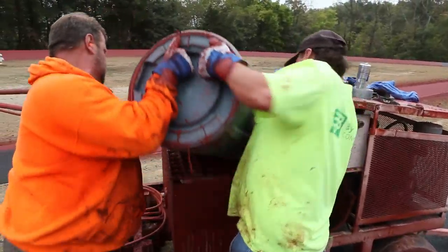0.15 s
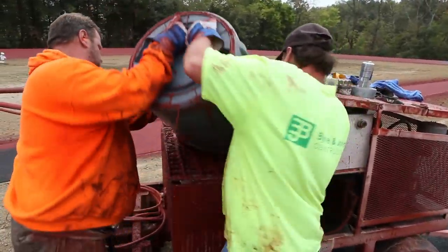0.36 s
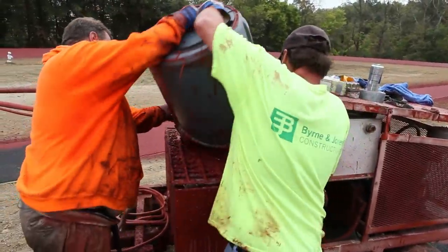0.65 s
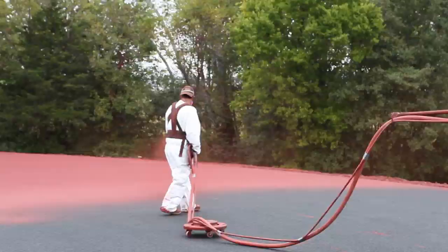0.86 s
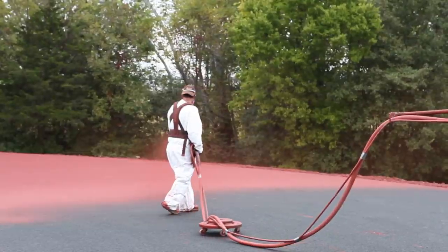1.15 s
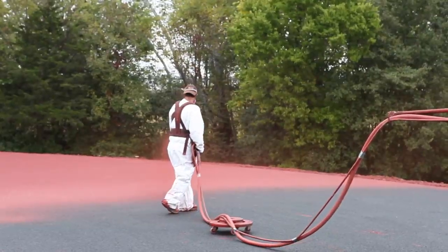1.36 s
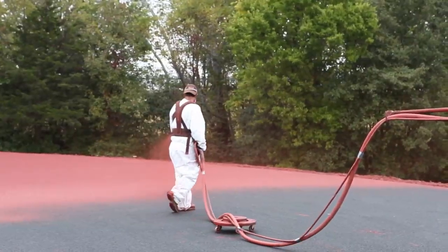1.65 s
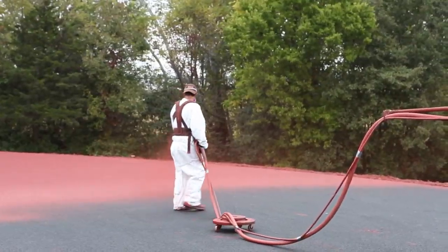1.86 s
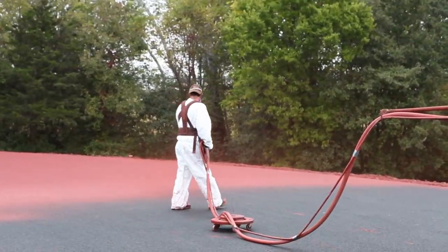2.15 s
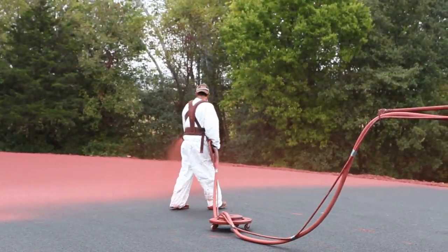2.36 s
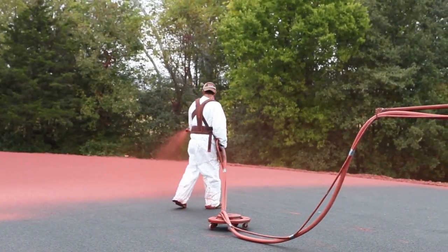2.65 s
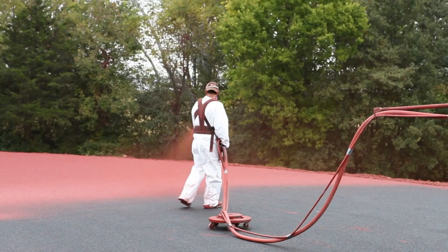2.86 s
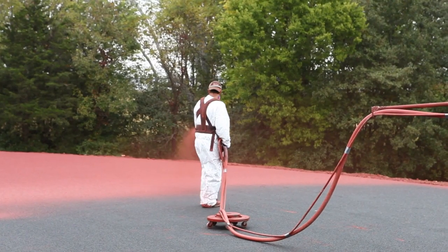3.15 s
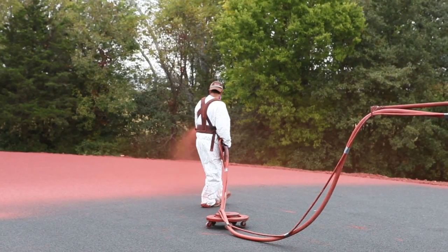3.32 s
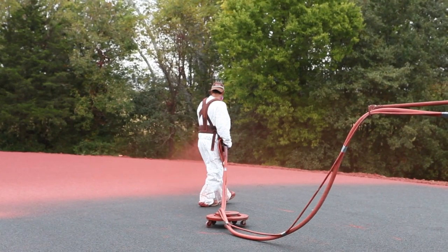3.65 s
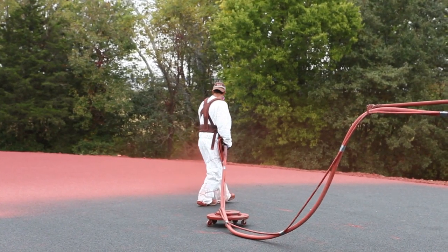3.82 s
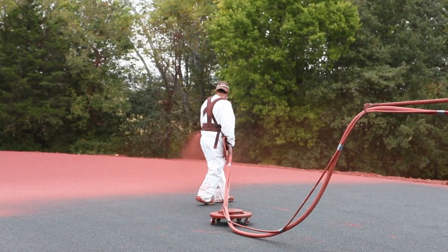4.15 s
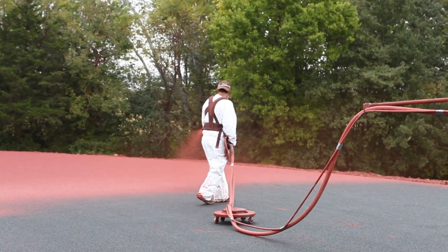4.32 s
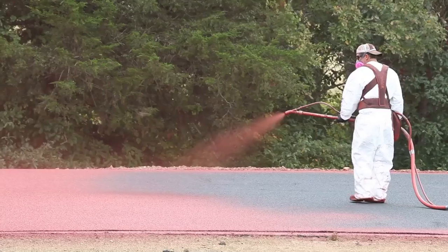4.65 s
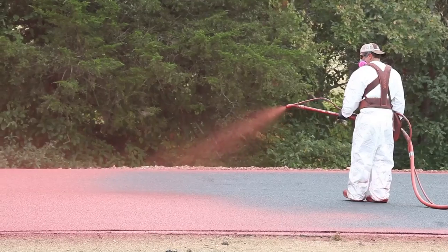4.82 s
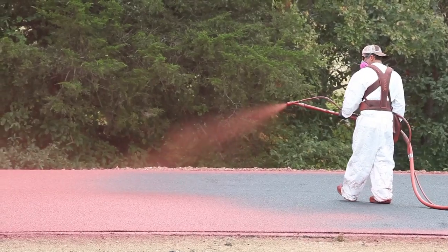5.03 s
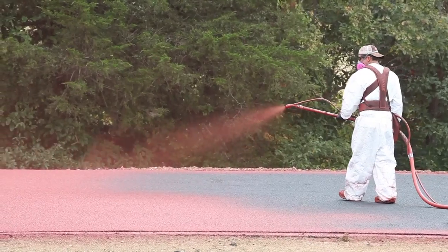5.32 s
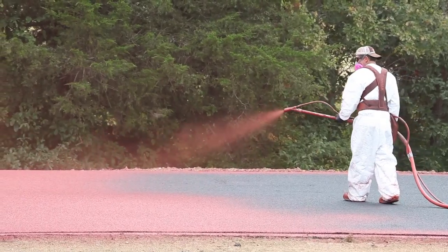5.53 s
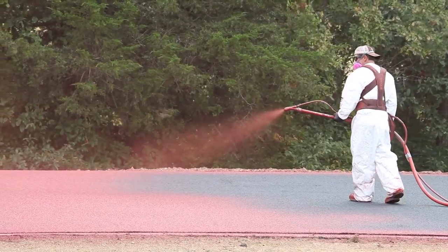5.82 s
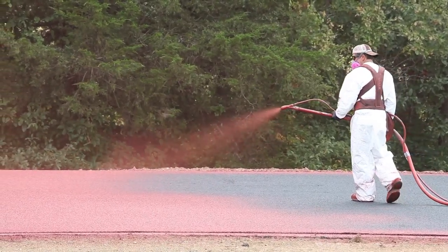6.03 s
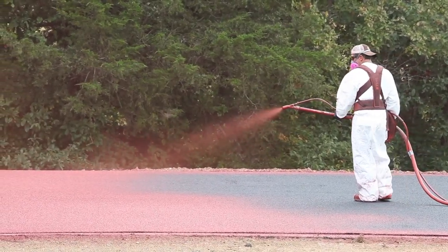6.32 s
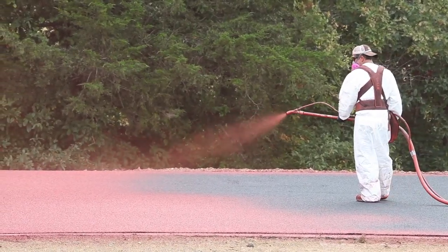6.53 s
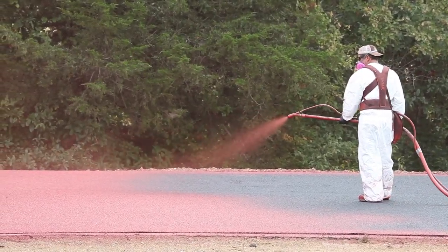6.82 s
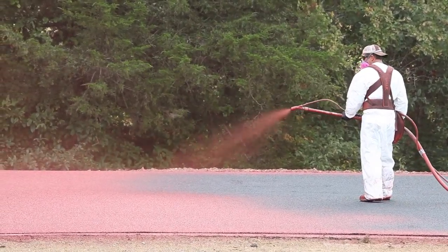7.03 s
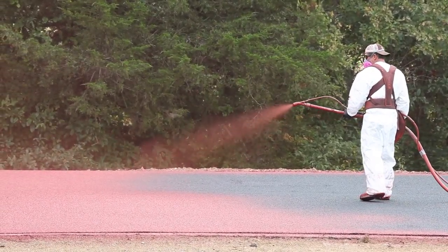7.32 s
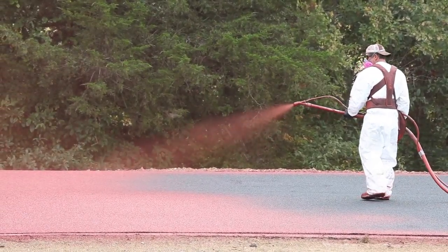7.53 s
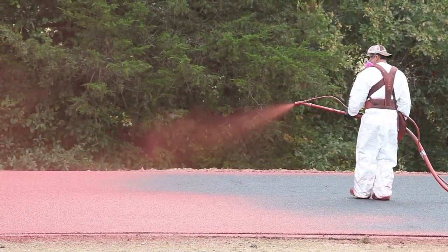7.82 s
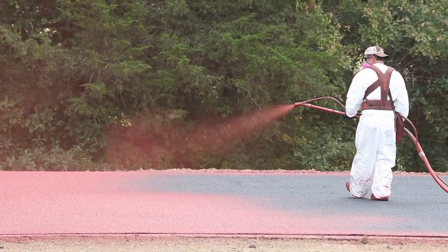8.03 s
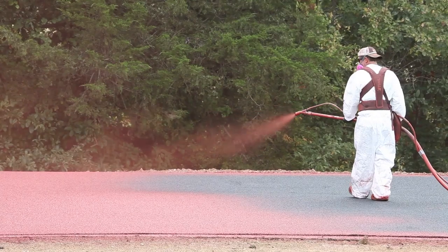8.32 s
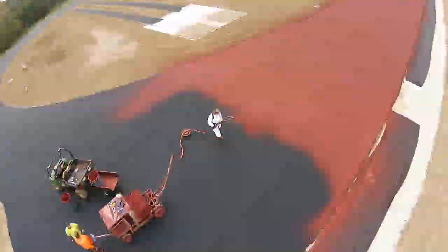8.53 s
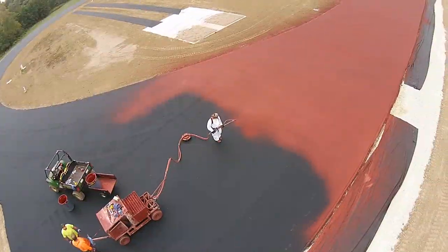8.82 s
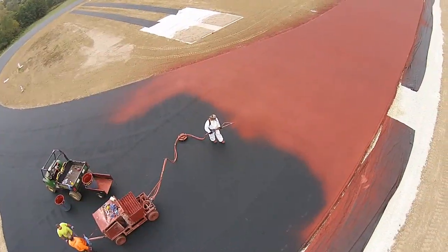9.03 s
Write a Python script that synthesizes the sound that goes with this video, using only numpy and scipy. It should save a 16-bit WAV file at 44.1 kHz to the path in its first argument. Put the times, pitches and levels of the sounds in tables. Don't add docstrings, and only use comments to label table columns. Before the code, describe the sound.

Three adjoining views of a paint spraying rig, all mono and outdoors. First, close separate engine chuffs with a soft fan rush; then a faster, steady motor rattle mixed with hiss that rises and falls five times as the jet swings past. Last and loudest, a close spray of wet granules, surging irregularly with fine ticks, its tone sweeping and nearly masking the distant engine. Sudden silence ends it.

```python
import sys
import numpy as np
from scipy import signal
from scipy.fft import rfft, irfft, next_fast_len
from scipy.io import wavfile
from scipy.ndimage import uniform_filter1d, map_coordinates

SR = 44100
rng = np.random.default_rng(int(sys.argv[2]) if len(sys.argv) > 2 else 0)


def decibels_to_gain(level_db):
    exponent = np.asarray(level_db, float) / 20
    return 10 ** exponent


def master_out(mix):
    frames = np.transpose(np.atleast_2d(mix))
    ceiling = np.clip(frames, -1, 1)
    pcm = np.round(ceiling * 32767).astype(np.int16)
    wavfile.write(sys.argv[1], SR, pcm)


N = 404397

FRAME = 512
LEAD = 4096
# f/Hz, level per Hz/dB
JET_COLOUR = [(30, -48.5), (140, -14), (320, -20), (430, -26), (900, -17), (1500, -8), (2900, -8),
              (4100, -4), (7200, -2), (9200, -12.5), (10300, -23), (12200, -22), (14000, -32.5),
              (15800, -39.5)]


def unit(x):
    return x / np.sqrt(np.mean(x ** 2) + 1e-20)


def along(points, hz):
    f, v = np.transpose(points)
    return np.interp(np.log(hz + 1), np.log(f + 1), v)


def curves(rows, t):
    s, *columns = np.transpose(rows)
    return [np.interp(t, s, column) for column in columns]


def bumps(s, at, half_s):
    at = np.reshape(at, (-1, 1))
    half_s = np.reshape(half_s, (-1, 1))
    return np.exp(-((s - at) / half_s) ** 2)


def filtered(x, response):
    m = next_fast_len(len(x) + SR // 2)
    hz = np.fft.rfftfreq(m, 1 / SR)
    return irfft(rfft(x, m) * response(hz), m)[:len(x)]


def wobble(n, rate):
    knots = rng.standard_normal(int(n * rate / SR) + 4)
    return map_coordinates(knots, [np.arange(n) * rate / SR])


def rush(t, rows, spectrum, width_hz, grit_db, patchy_db, flutter_db, bright, ground=[(0, 1, 0)]):
    grit = decibels_to_gain(grit_db * wobble(len(t), 1400) + flutter_db * wobble(len(t), 60))
    hz, s, z = signal.stft(grit * rng.standard_normal(len(t)), SR, nperseg=FRAME)
    hz = hz[:, None]
    level_db, peak_hz, peak_db = curves(rows, t[0] + s)
    notch_hz, echo = curves(ground, t[0] + s)

    patches = uniform_filter1d(rng.standard_normal(z.shape), size=8, axis=0)
    patches = uniform_filter1d(patches, size=14, axis=1)
    colour_db = along(spectrum, hz) + patchy_db * unit(patches)
    colour_db += peak_db * np.exp(-((hz - peak_hz) / width_hz) ** 2)
    colour_db += bright * (level_db - level_db.mean()) * np.log2(np.maximum(hz, 700) / 6000)
    colour_db -= 7 * echo * np.exp(-((hz - notch_hz) / 330) ** 2)

    echo = echo * np.clip(hz / 3000, 0, 1)
    turns = (hz / notch_hz) ** .93
    gain = decibels_to_gain(colour_db) * (1 - np.clip(echo, 0, .9) * np.exp(-2j * np.pi * turns))
    gain /= np.sqrt(np.mean(abs(gain) ** 2, axis=0))
    hiss = signal.istft(z * gain, SR, nperseg=FRAME)[1][:len(t)]
    return decibels_to_gain(curves(rows, t)[0]) * unit(hiss)


def granules(t):
    per_s, level_db, spread_db = 110, -37, 12
    hits = rng.random((2, len(t)))
    size_db = spread_db * rng.random(len(t)) ** 2
    ticks = (hits[0] < per_s / SR) * np.sign(hits[1] - .5) * decibels_to_gain(size_db)
    return decibels_to_gain(level_db) * unit(filtered(ticks, lambda f: decibels_to_gain(along(JET_COLOUR, f))))


def engine(t, speed, order, levels, pipe, shake, blast, blow_s, scatter_db, second_db, wall):
    first, lag_second = order
    cycle = np.cumsum(curves(speed, t)[0]) / SR
    cycle = cycle - cycle[LEAD] - first
    pulses = np.zeros(len(t))
    for lag, db in [(0, 0), (lag_second, second_db)]:
        fired = np.flatnonzero(np.diff(np.floor(cycle - lag)))
        pulses[fired] = decibels_to_gain(db + scatter_db * rng.standard_normal(len(fired)))

    def chamber(f, c, w):
        return 1.5j * f * w / (c * c - f * f + 1.5j * f * w)

    def modes(f):
        return sum((-1) ** k * decibels_to_gain(db) * chamber(f, c, w) ** 2 for k, (c, w, db) in enumerate(pipe))

    def puff(f):
        return np.exp(-2j * np.pi * f * 0.00058) / (1 + 2j * np.pi * f * blow_s) ** 4

    def bounce(f):
        delay_s, share = wall
        return (1 + share * np.exp(-2j * np.pi * f * delay_s)) / np.hypot(1, share)

    beat = -unit(filtered(pulses, modes))
    for k, db in shake:
        beat += decibels_to_gain(db + 3) * np.sin(2 * np.pi * (round(k) * cycle + rng.random()))
    opening = filtered(pulses, puff)
    gas = filtered(rng.standard_normal(len(t)), lambda f: decibels_to_gain(along(blast, f)))
    beat_db, blast_db = curves(levels, t)
    direct = decibels_to_gain(beat_db) * beat + decibels_to_gain(blast_db) * unit(opening * gas)
    return filtered(direct, bounce)


def idling(t):
    # t/s, rate/Hz
    idle_speed = [(0.0, 16.87), (0.313, 16.93), (0.627, 16.69), (0.94, 17.14)]
    # t/s, beat/dB, gas blast/dB
    idle_levels = [(0, -22, -28), (0.94, -23, -26)]
    # f/Hz, width/Hz, level/dB
    idle_pipe = [(97.8, 27.3, 3.5), (146, 19, -11.5), (171.5, 35, -14), (275, 160, -15.5), (342, 22, 2),
                 (425.5, 19, -6), (490, 28.5, -2.5), (548, 39, -11.5), (693, 83, -12.5), (895, 15, -12),
                 (991, 29, -6), (1202, 40, -8.5), (1310, 33, -5.5), (1456, 54, -11.5), (1728, 74, -17.5),
                 (2374, 58, -10)]
    # multiple of the cycle, level against the beat/dB
    idle_shake = [(4, -27.5), (9, -13.5), (11, -10.5), (15, -16), (17, -17)]
    # f/Hz, level per Hz/dB
    idle_blast = [(60, -37), (150, -19), (500, -7.5), (800, -10), (1300, -6), (1880, -7.5), (2410, -8),
                  (2800, -11), (3300, -11.5), (5900, -10.5), (6700, -3.5), (7800, -12), (9000, -22),
                  (15800, -48)]
    # t/s, level/dB, hiss peak f/Hz, hiss peak/dB
    idle_air = [(0, -27.5, 6630, 3), (0.941, -27, 6610, 0.5)]
    # f/Hz, level per Hz/dB
    idle_rush = [(30, -42), (100, -4.5), (500, -11), (1200, -14), (3000, -22), (6600, -15.5), (8600, -29.5),
                 (11500, -27.5), (15800, -34)]
    chuffs = engine(t, idle_speed, (.095, .378), idle_levels, idle_pipe, idle_shake, idle_blast,
                    blow_s=0.002, scatter_db=0.7, second_db=2.0, wall=(.0074, .3))
    fan = rush(t, idle_air, idle_rush, width_hz=790, grit_db=0.5, patchy_db=1.5, flutter_db=0.5, bright=0)
    return chuffs + fan


def working(t):
    # t/s, rate/Hz
    work_speed = [(0.95, 27.215), (2.632, 27.25), (3.305, 27.42), (3.641, 27.27), (4.65, 27.0)]
    # t/s, beat/dB, gas blast/dB
    work_levels = [(0.95, -23, -24.5), (2.79, -25, -26), (4.64, -23.5, -26.5)]
    # f/Hz, width/Hz, level/dB
    work_pipe = [(81, 43, -4), (166.9, 22.3, 3.5), (433.7, 18, -13.5), (485.7, 17, -12.5), (712, 98, -4.5),
                 (761, 150, -13.5), (1008, 34, -10), (1075, 52, -14.5), (1536, 51, -10), (1823, 37.4, -1.5),
                 (2223, 60, -16.5), (2340, 45, -30), (2781, 70, -12.5), (3764, 92, -21), (4476, 100, -16)]
    # multiple of the cycle, level against the beat/dB
    work_shake = [(1, -24), (7, -14), (9, -30), (10, -36.5), (12, -22), (14, -27), (25, -34.5), (28, -21),
                  (42, -21)]
    # f/Hz, level per Hz/dB
    work_blast = [(150, -13.5), (450, -29), (720, -12), (900, -16.5), (1050, -3.5), (1400, -5), (1830, 1.5),
                  (2050, -4), (2750, -2), (4430, -3.5), (5450, -4.5), (6480, 2.5), (9650, -12.5),
                  (15800, -35)]
    # f/Hz, level per Hz/dB
    work_rush = [(30, -40), (150, -3), (300, -12), (700, -4.5), (2000, -8.5), (4000, -6.5), (6400, -3.5),
                 (8400, -8.5), (9700, -21), (12000, -25.5), (15800, -42.5)]
    # t/s, gain/dB
    passes = [
        (0.93, 3.5),
        (1.6, 4),
        (2.62, 6.5),
        (3.33, 4.5),
        (4.3, 5),
    ]
    rattle = engine(t, work_speed, (.435, .381), work_levels, work_pipe, work_shake, work_blast,
                    blow_s=0.0016, scatter_db=0.0, second_db=-0.3, wall=(.0074, .35))
    s = t[::FRAME]
    at, gain_db = np.transpose(passes)
    swell_db = gain_db @ bumps(s, at, .25)
    jet = np.c_[s, -30 + swell_db, 6300 + 39 * swell_db, 1.8 + .3 * swell_db]
    return rattle + rush(t, jet, work_rush, width_hz=1100, grit_db=1.0, patchy_db=1.45,
                         flutter_db=0.5, bright=0.53)


def spraying(t):
    # t/s, rate/Hz
    far_speed = [(4.655, 26.8), (5.523, 26.99), (5.957, 26.86), (6.391, 26.98), (7.9, 27.0), (8.56, 27.13)]
    # f/Hz, width/Hz, level/dB
    far_pipe = [(54, 27, -1), (77, 42, 3), (159.5, 59, 4), (230, 69, -3.5), (345, 22, -11.5),
                (627, 89, -10.5), (830, 98, -6), (1114, 180, -14), (1720, 1140, -8), (3500, 900, -39)]
    # multiple of the cycle, level against the beat/dB
    far_shake = [(4, -20.5), (9, -15.5), (11, -18.5), (12, -15.5), (14, -21.5), (20, -25), (23, -18.5),
                 (27, -20), (28, -24)]
    # f/Hz, level per Hz/dB
    far_blast = [(300, -32), (800, -11), (1800, -5.5), (3500, -6.5), (6500, -7.5), (9000, -25),
                 (15800, -66)]
    # t/s, loss/dB, half length/s
    lulls = [
        (4.68, 5, 0.13),
        (5.67, 4, 0.12),
        (6.45, 2, 0.2),
        (7.1, 5.3, 0.31),
        (7.92, 2.9, 0.45),
    ]
    # t/s, gain/dB, half length/s, hiss peak gain/dB
    surges = [(4.72, 4.5, .11, 7), (5.23, 5.5, .22, -1.5), (5.616, 4, 0.15, 2.5), (6.037, 4, 0.19, -0.5),
              (6.347, 5.5, 0.19, 2), (6.724, 3.5, 0.17, 1.5), (6.97, 4, 0.12, 3.5), (7.42, 2, 0.2, 2.5),
              (7.8, 3.5, 0.18, 0.5), (8.241, 2, 0.17, 0.9), (8.57, 5, 0.13, 5)]
    # t/s, drop/Hz, half length/s
    dips = [
        (5.27, 600, 0.25),
        (5.95, 447, 0.36),
        (6.44, 870, 0.31),
        (8.143, 582, 0.38),
    ]
    s = t[::FRAME]
    at, loss_db, half_s = np.transpose(lulls)
    shade_db = loss_db @ bumps(s, at, half_s)
    far = np.c_[s, -37 - shade_db, -42.5 - 1.48 * shade_db]
    drone = engine(t, far_speed, (.195, .38), far, far_pipe, far_shake, far_blast,
                   blow_s=0.00041, scatter_db=0.2, second_db=-3.2, wall=(.0074, .15))

    at, gain_db, half_s, aim_db = np.transpose(surges)
    surge = bumps(s, at, half_s)
    jet = np.c_[s, -24 + gain_db @ surge, 6870 + 0 * s, 1.5 + aim_db @ surge]

    at, drop_hz, half_s = np.transpose(dips)
    dip_hz = drop_hz @ bumps(s, at, half_s)
    sweep = np.c_[s, 3800 - dip_hz, .27 + .26 * dip_hz / 1000]
    spray = rush(t, jet, JET_COLOUR, width_hz=2000, grit_db=1.5, patchy_db=0.52, flutter_db=0.5,
                 bright=0.14, ground=sweep)
    return drone + spray + granules(t)


def scene():
    changes = [
        0,
        .938,
        4.651,
        8.571,
    ]
    marks = np.round(np.array(changes) * SR).astype(int)
    parts = []
    for place, start, end in zip((idling, working, spraying), marks, marks[1:]):
        t = np.arange(start - LEAD, end) / SR
        parts.append(place(t)[LEAD:])
    mono = np.concatenate(parts + [np.zeros(N - marks[-1])])
    return np.array([mono, mono])


def top_cut(x):
    return signal.sosfilt(signal.butter(12, 16110, fs=SR, output="sos"), x)


def record(dry):
    def bass_cut(f):
        x = 1j * f / 46
        return (x ** 2 / (1 + 1.2 * x + x ** 2)) ** 2

    heard = filtered(dry[0], bass_cut) * (dry[0] != 0)
    heard = filtered(heard, lambda f: np.clip((15900 - f) / 150, 0, 1))
    return top_cut(np.array([heard, heard]))


dry = scene()
out = record(dry)
master_out(out)
```